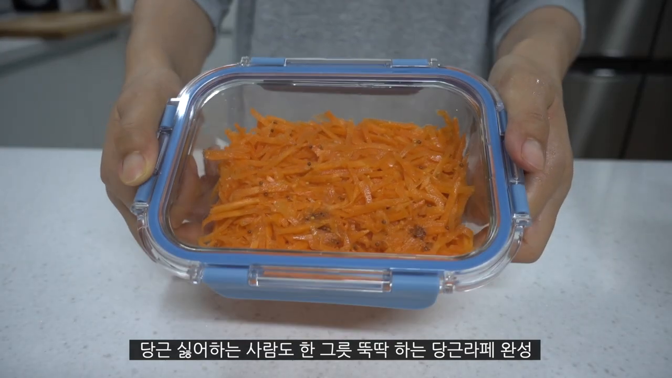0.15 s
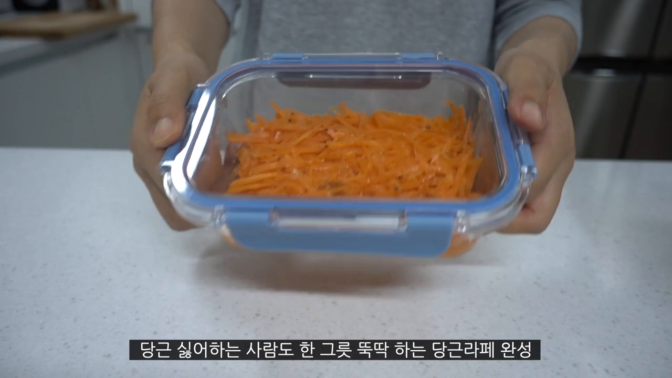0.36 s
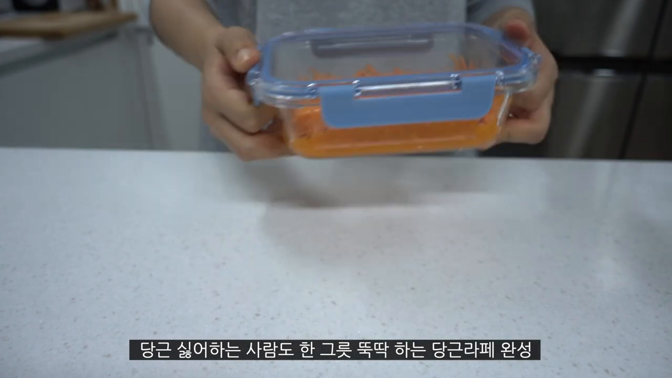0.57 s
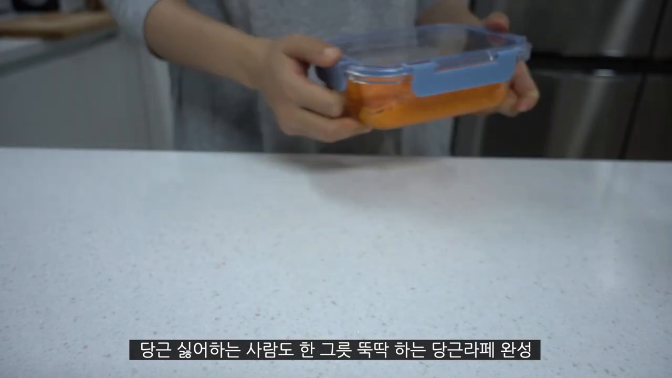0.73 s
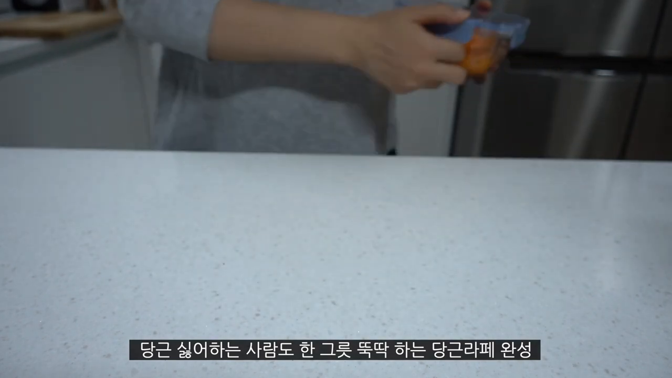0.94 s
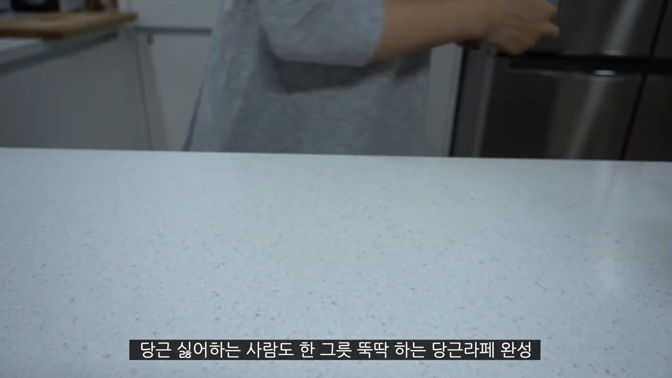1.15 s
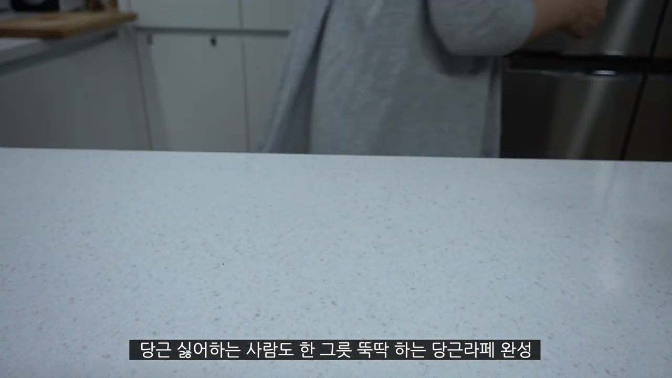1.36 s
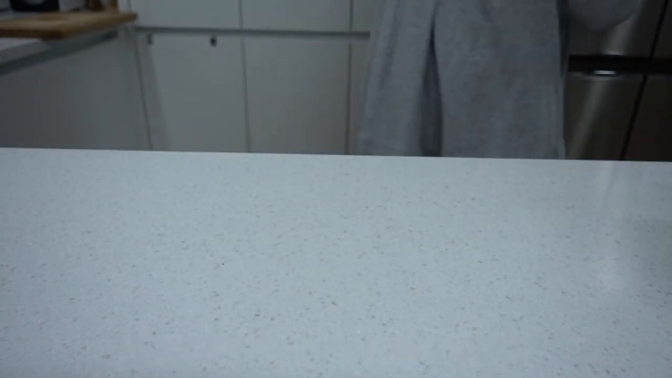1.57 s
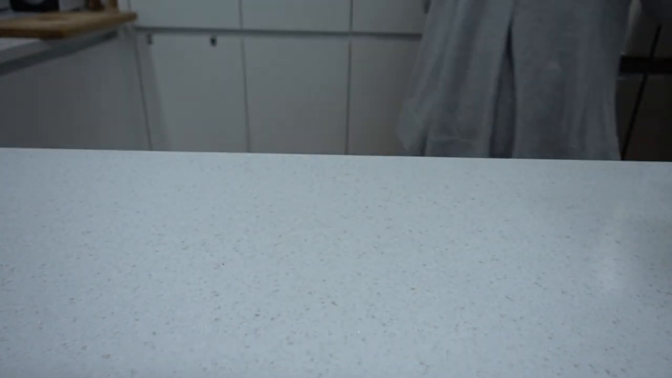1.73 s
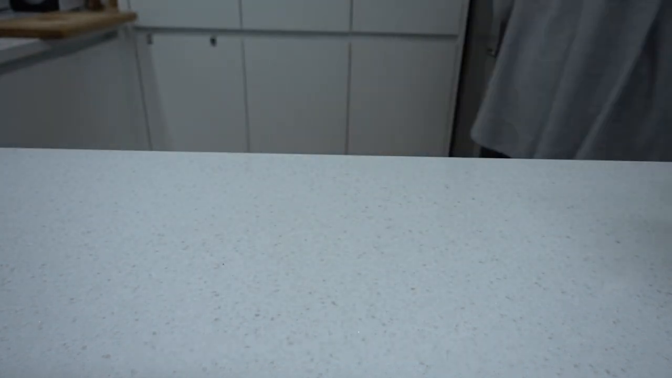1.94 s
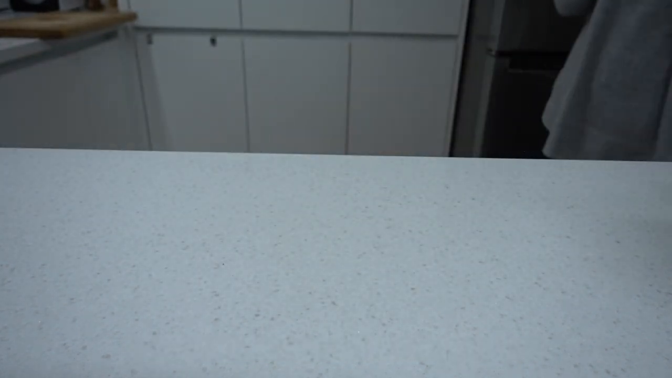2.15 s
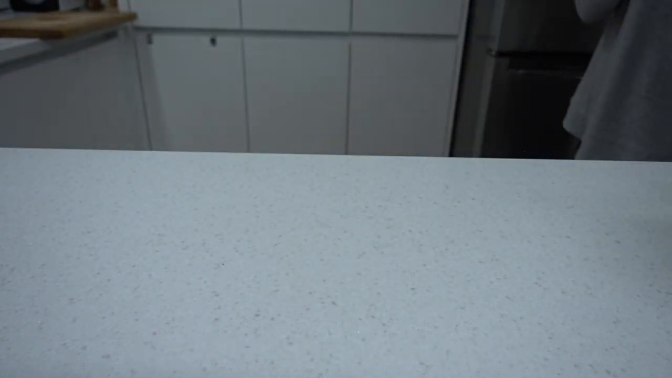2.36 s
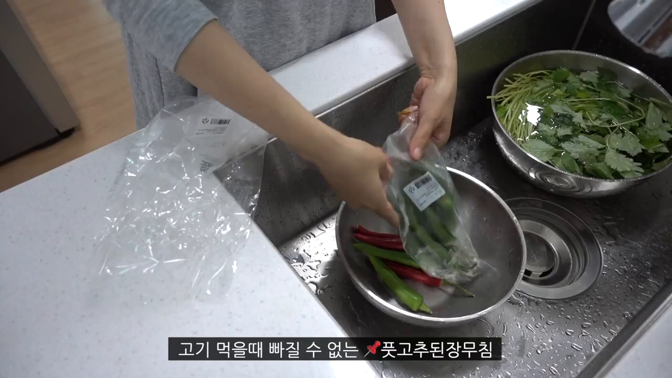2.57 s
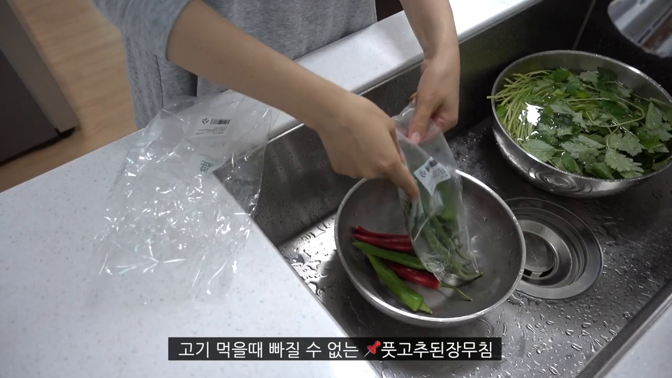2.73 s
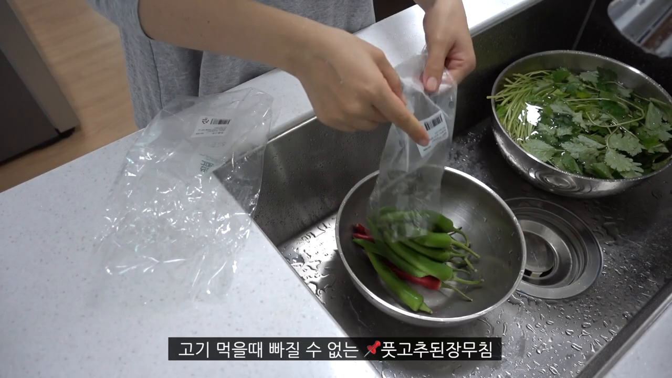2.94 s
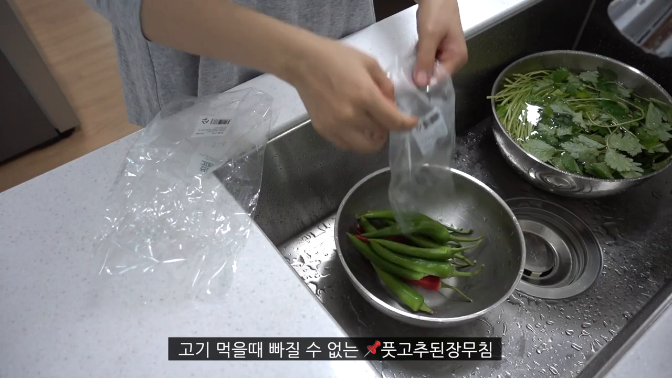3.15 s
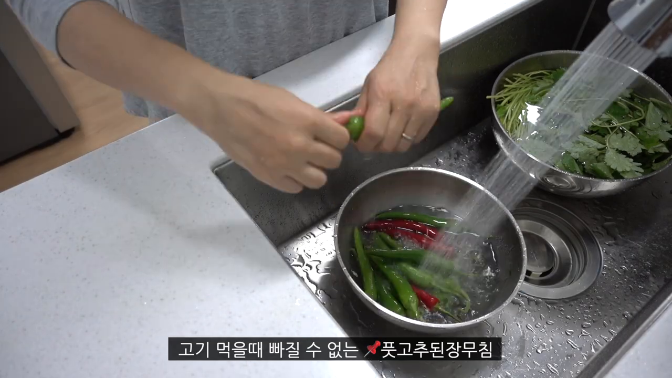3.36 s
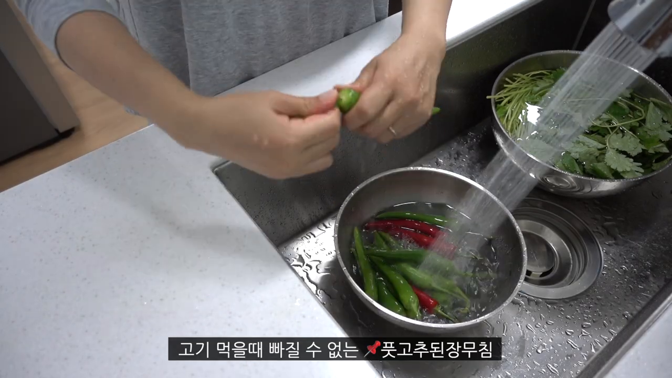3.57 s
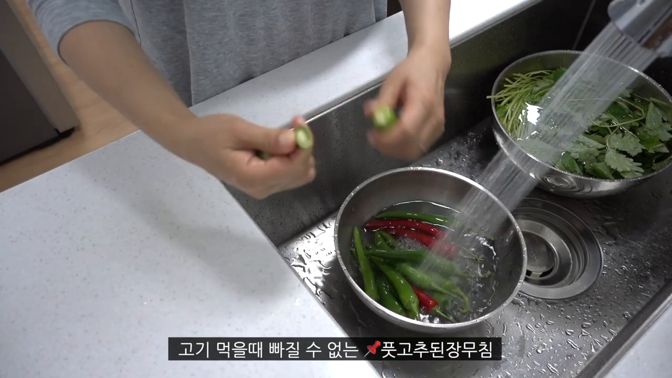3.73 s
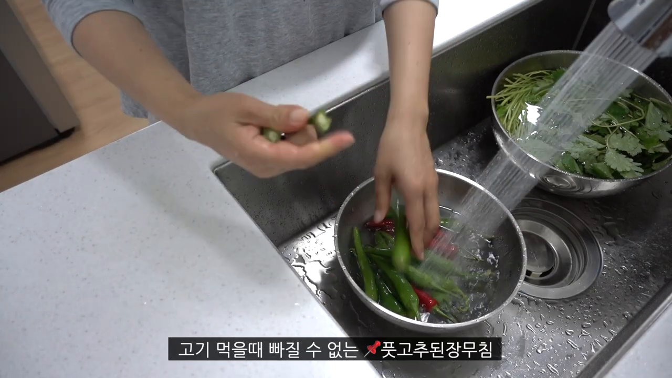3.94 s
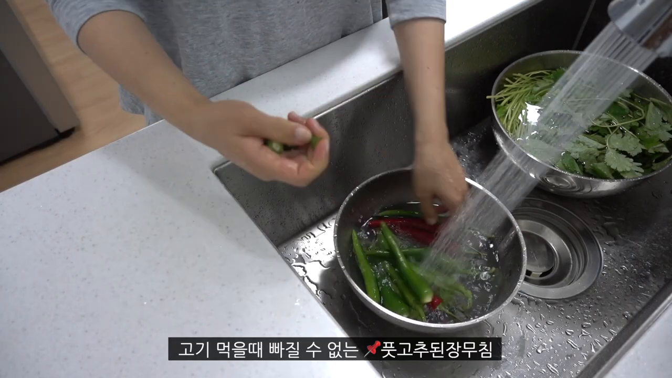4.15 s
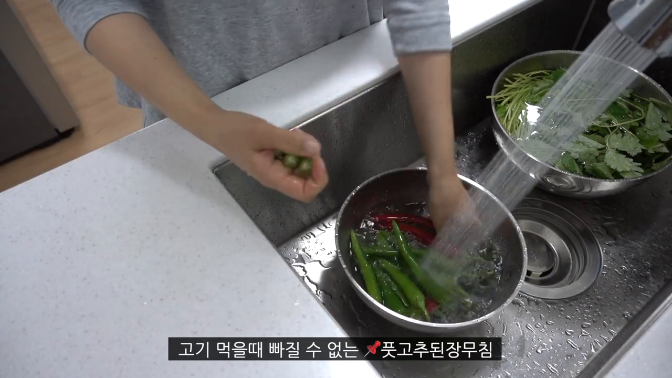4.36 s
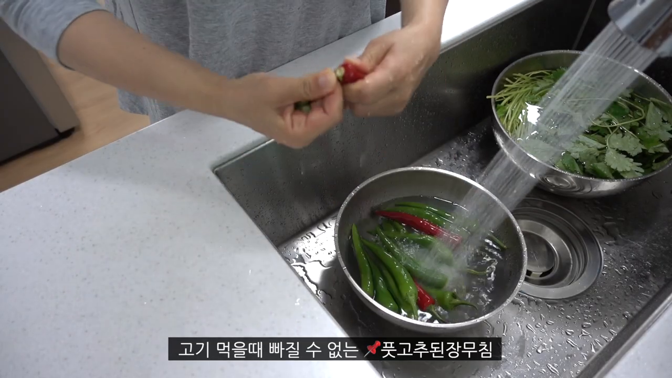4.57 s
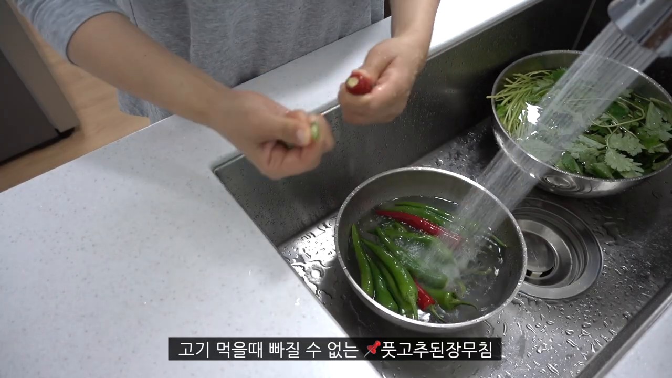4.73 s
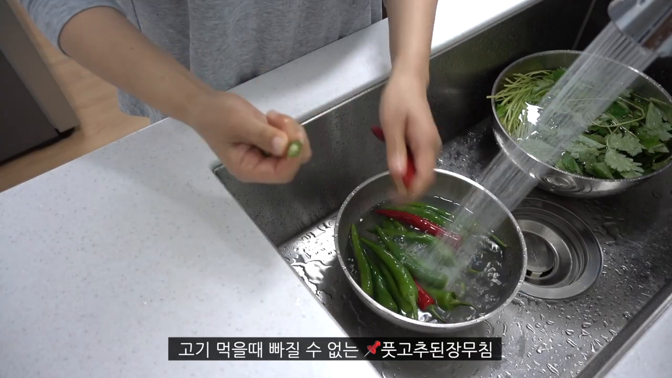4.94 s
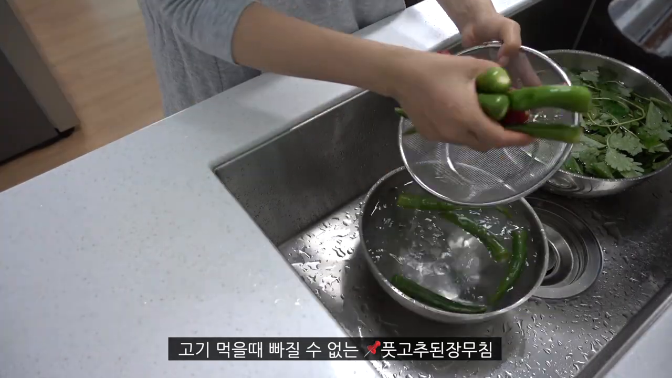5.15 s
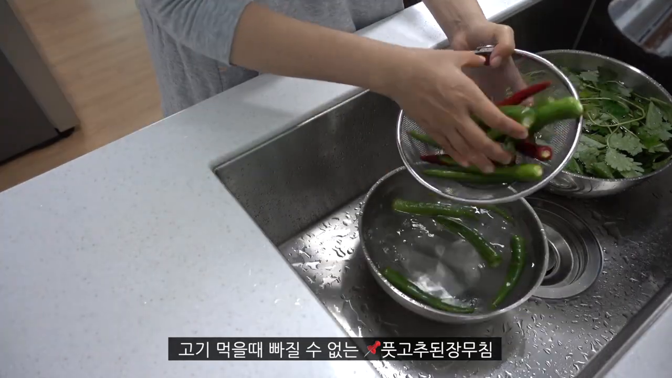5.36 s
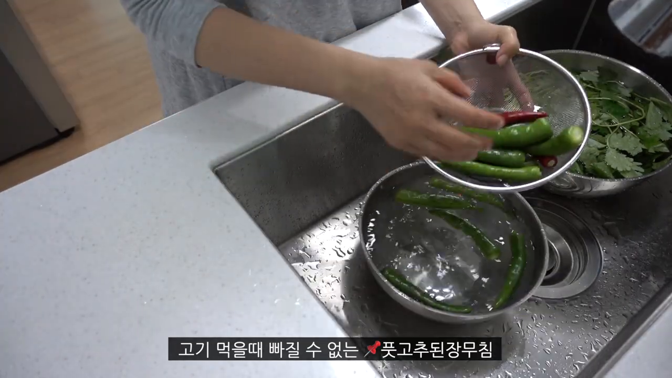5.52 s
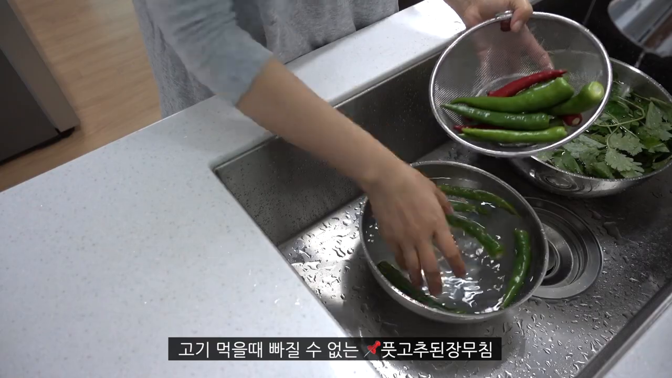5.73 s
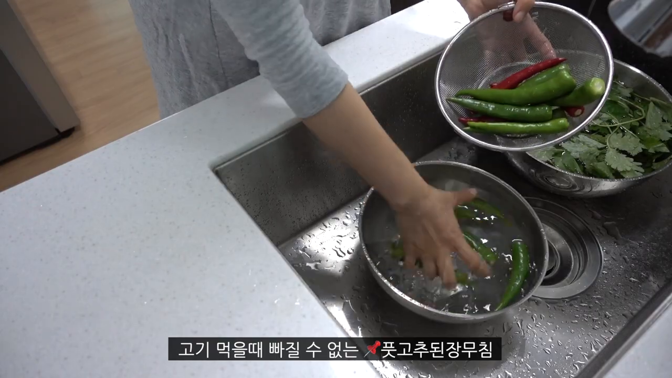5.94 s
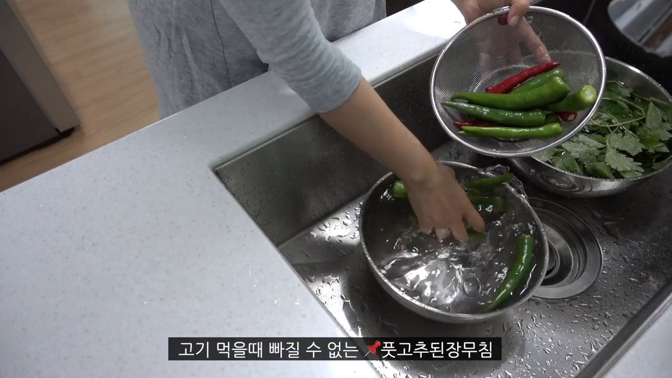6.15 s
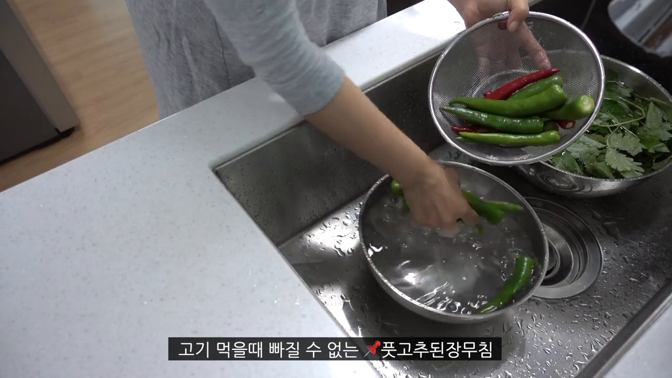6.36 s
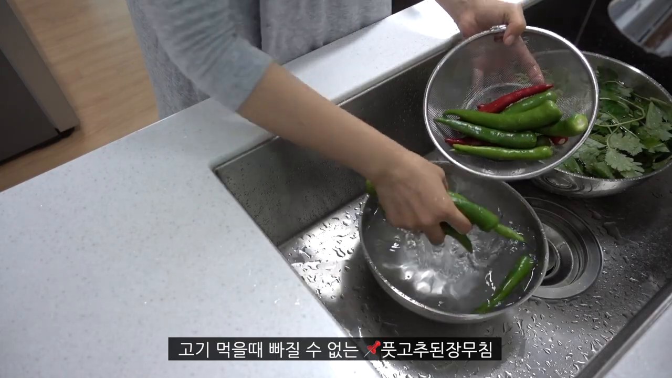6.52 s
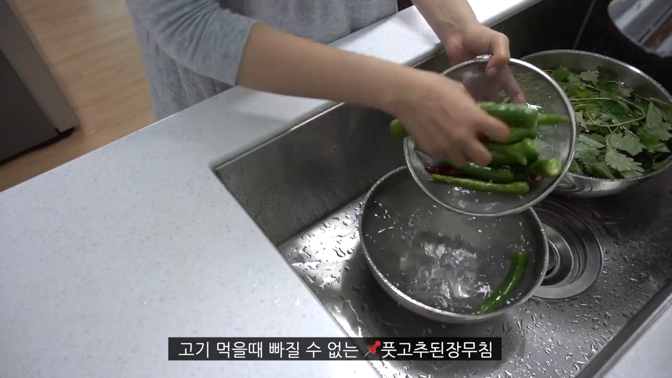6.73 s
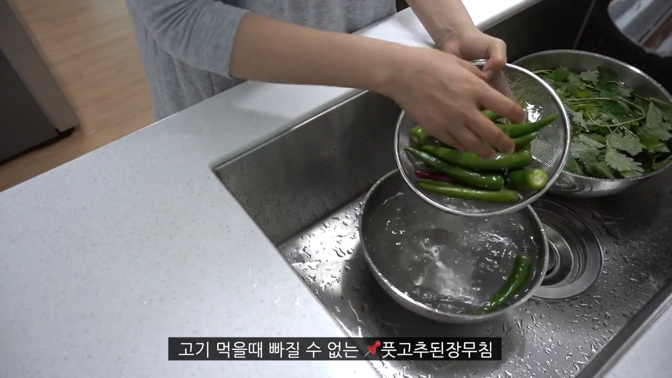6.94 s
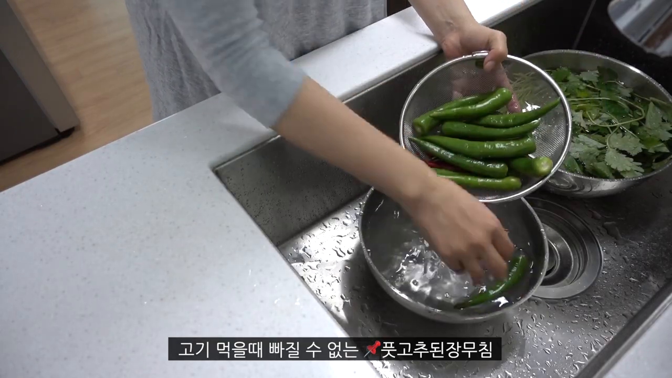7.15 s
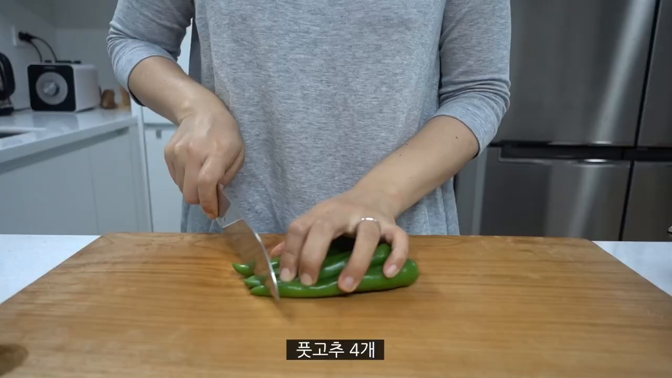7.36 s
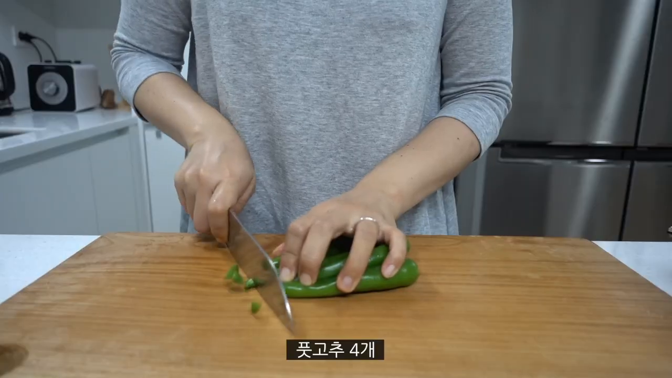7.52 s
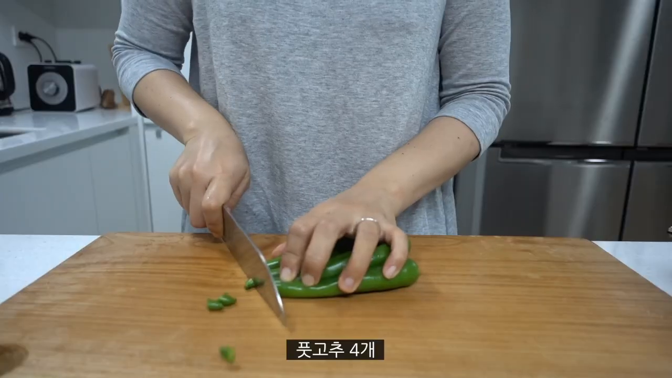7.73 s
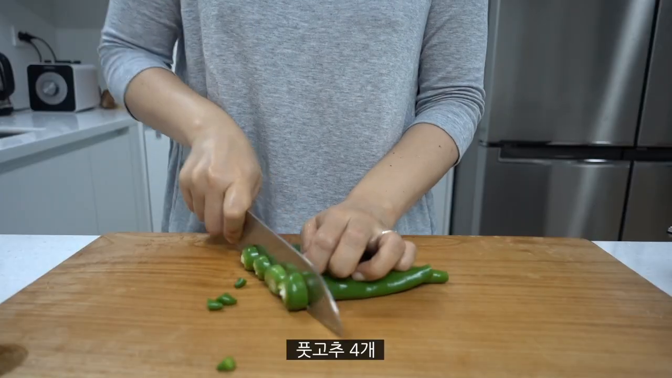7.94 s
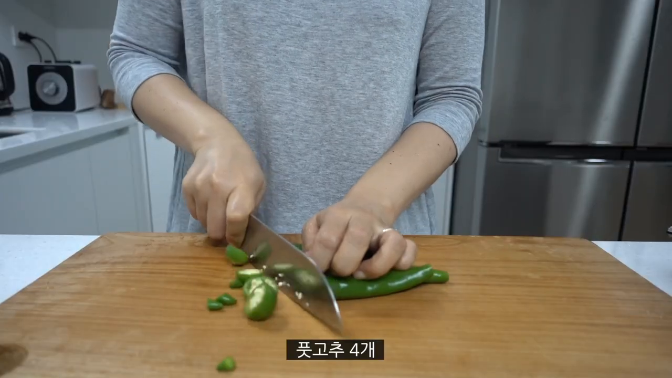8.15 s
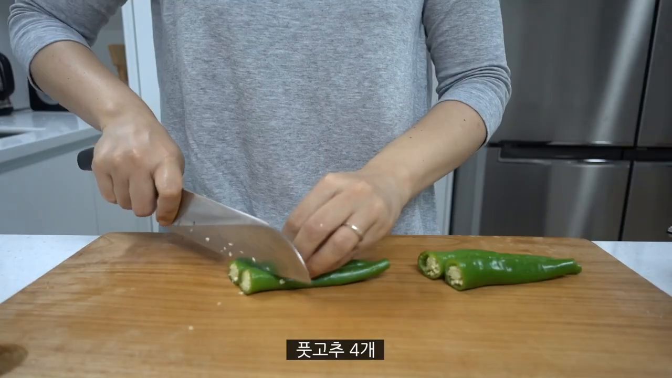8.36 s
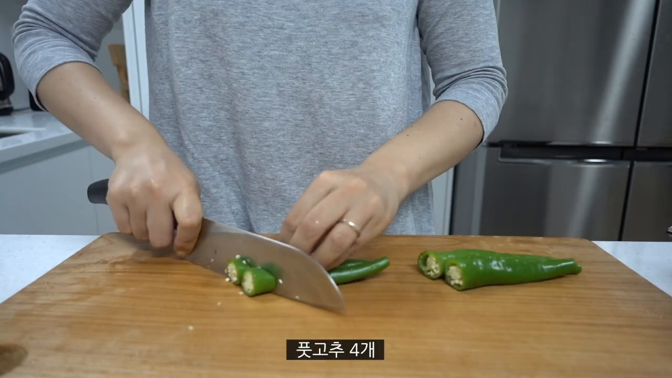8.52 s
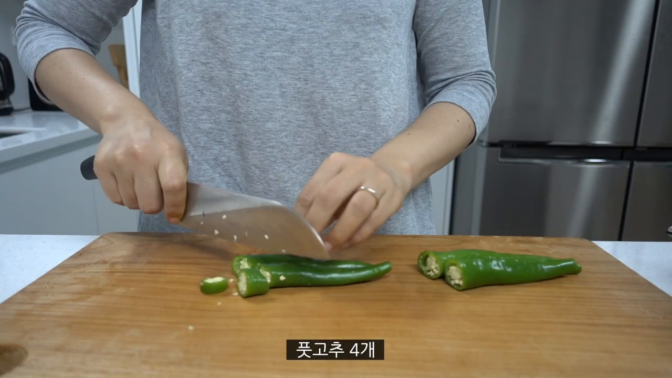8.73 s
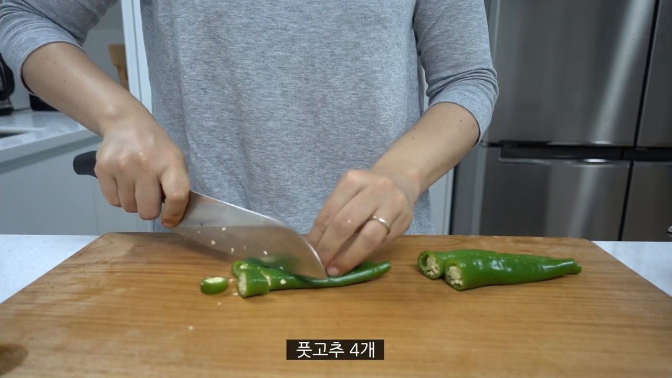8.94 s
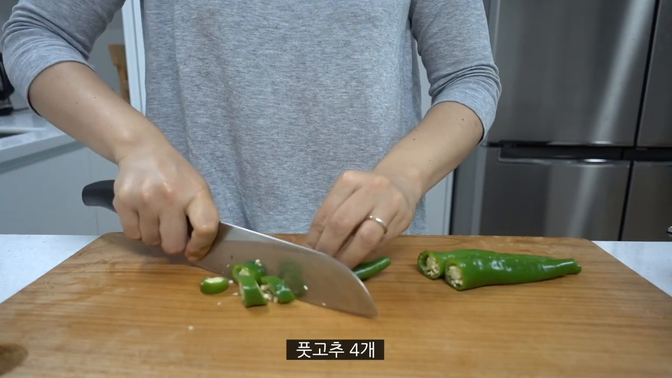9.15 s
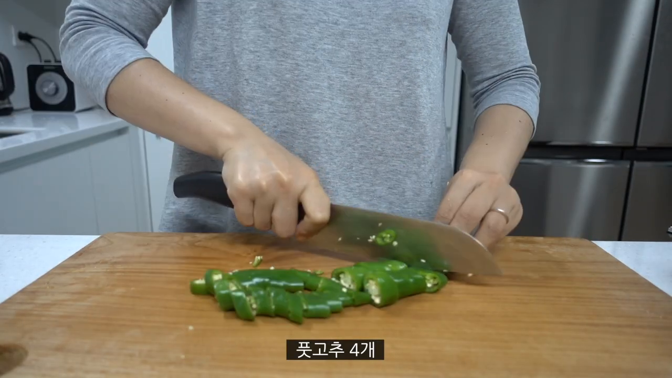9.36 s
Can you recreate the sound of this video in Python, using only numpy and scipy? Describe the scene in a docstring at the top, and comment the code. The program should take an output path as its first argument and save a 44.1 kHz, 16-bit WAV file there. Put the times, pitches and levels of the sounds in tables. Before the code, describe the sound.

In a quiet home kitchen, clothes rustle faintly and a dull shuffle recedes. A plastic bag crinkles sharply while peppers tumble into a steel bowl. Abruptly a spray tap drums and hisses, with a stem snapping. Then water swishes, plops and drips as peppers are lifted out. Finally a knife crunches through peppers and knocks hard on a wooden board. Close stereo microphones, short lively echo.

```python
"""Quiet room air and rustling clothes come first, then a dull shuffle: green peppers are prepared in a kitchen.
In short passages joined end to end, noise crinkles like a plastic bag and clicks tumble like sliding peppers.
Showers of clicks make a spray tap fill a steel bowl in the sink; a noisy burst is a stem snapping.
A hand swishes the water and lifts the peppers dripping into a sieve: clicks splash, climbing tones are bubbles.
Last, a knife crunches through them, in swelling showers of clicks, and knocks on a ringing wooden board."""
import sys
import numpy as np
from scipy import signal
from scipy.fft import rfft, irfft, next_fast_len
from scipy.io import wavfile
from scipy.ndimage import uniform_filter1d, map_coordinates

SR = 44100
rng = np.random.default_rng(int(sys.argv[2]) if len(sys.argv) > 2 else 0)


def waveform_to_disk(signal):
    """Save audio, clipped to [-1, 1], as 16-bit WAV at the path in sys.argv[1]."""
    frames = np.transpose(np.atleast_2d(signal))
    scaled = np.clip(frames, -1, 1) * 32767
    samples = np.round(scaled).astype(np.int16)
    wavfile.write(sys.argv[1], SR, samples)


N = 414099

# passages of sound: (start t/s, end t/s)
HALL_SPAN, BAG_SPAN = (-1, 2.52), (2.518, 3.387)
TAP_SPAN, WASH_SPAN = (3.387, 5.104), (5.104, 7.352)
# moments when the board's sound is cut off: t/s
BOARD_ENDS = [8.312, 9.268]

# room air, steady within each step: (from t/s, level/dB)
ROOM_TONE = [(0, -62), (5.104, -58), (7.352, -59), (8.312, -65)]
# a sleeve brushes the apron: (t/s, length/s, level/dB)
BRUSHES = [(1.25, 0.047, -65.5), (1.76, 0.068, -55), (2.15, 0.065, -58), (2.38, .14, -54.5)]
# dull shuffles across the room: (t/s, length/s, level/dB)
SHUFFLES = [(2.222, .02, -56.5), (2.36, 0.12, -41)]
# shakes of the bag: (t/s, length/s, level/dB)
SHAKES = [(2.516, 0.029, -27), (2.55, 0.075, -20), (2.715, 0.059, -26.5), (2.8, 0.057, -26),
          (2.88, 0.066, -30), (3.028, 0.11, -33.5), (3.219, 0.039, -31)]
# tumbling peppers vary less than the film: level/dB under a full-scale shake, dB per dB of shake
TUMBLE_DB, TUMBLE_FOLLOWS = -11, 0.76
# brittle snaps of plastic film, a pepper stem and pepper skin:
# (t/s, level/dB, length/s, centre f/Hz, width/octaves)
SNAPS = [(2.7524, -20.5, 0.002, 4000, 1.3), (3.086, -32, 0.0098, 5500, 1.8),
         (3.136, -16.5, 0.0082, 6540, 0.06), (4.2605, -18, 0.054, 5100, 1.1), (7.546, -29, .014, 2900, .12),
         (7.893, -33.5, 0.028, 1620, .8), (7.979, -28.5, 0.021, 1850, 0.65),
         (8.41, -32.5, 0.042, 2300, 0.54), (9.067, -18, 0.014, 5500, 1.8)]
TAP_DB = -24  # level of the jets, dB
# a dull low thud, then single fading notes from the touched bowl: (t/s, peak level/dB, f/Hz, t60/s)
THUD_AND_NOTES = [(4.062, -37, 214, 0.079), (4.266, -24, 1763, 0.3), (5.141, -43, 2130, 0.07),
                  (5.147, -37, 1363, 0.06)]
# wet slaps: (t/s, level/dB, length/s, centre f/Hz, width/octaves)
SLAPS = [(5.127, -46, 0.0055, 6000, 0.26), (5.314, -28.5, 0.0093, 7100, 0.28),
         (5.936, -30, 0.0054, 6370, 1.1), (6.395, -33, 0.017, 3050, 9.5), (7.269, -44.5, 0.012, 980, 0.4),
         (7.2705, -33.5, 0.017, 7430, 0.18)]
# single air bubbles: (t/s, peak level/dB, starting f/Hz, t60/s)
BUBBLES = [(5.2246, -31, 1615, 0.024), (5.23, -34, 2280, .035), (5.318, -33, 1530, 0.035),
           (5.368, -38, 622, 0.099), (5.9379, -17.5, 1670, 0.035), (5.988, -34, 1190, .05),
           (6.002, -38.5, 520, 0.07), (6.03, -35.5, 880, 0.05), (6.04, -29, 2605, 0.07),
           (6.074, -40, 635, 0.11), (6.1022, -34.5, 2490, 0.065), (6.1978, -39.5, 2720, .04),
           (6.266, -36.5, 2090, 0.022), (6.3977, -23.5, 2220, 0.04), (6.4555, -36, 2880, 0.05),
           (6.457, -39, 744, 0.067), (6.782, -39, 3750, .04), (6.853, -38, 3320, 0.04),
           (6.9992, -29.5, 2950, 0.14)]
CLIMB = 0.1  # share by which a bubble's pitch climbs
# the wet sieve drips onto the steel: (t/s, level/dB, centre f/Hz)
DRIPS = [(6.213, -49, 11700), (6.513, -41.5, 6140), (6.759, -45.5, 8540), (6.815, -36.5, 8900),
         (6.849, -38, 8500)]
# the hand sweeps through the water: (t/s, length/s, level/dB)
STIRS = [(5.305, 0.13, -44), (5.887, 0.038, -46.5), (5.95, 0.11, -46), (6.393, 0.09, -43),
         (6.875, 0.041, -43.5)]
# showers of fine drops from hand and sieve: (t/s, length/s, level/dB)
SHOWERS = [(5.287, 0.16, -33), (5.84, 0.071, -43), (6.4, 0.15, -46.5), (6.58, 0.3, -48),
           (6.888, 0.083, -30.5)]
# the hand thuds dully against the bowl: (t/s, level/dB, length/s, centre f/Hz, width/octaves)
THUDS = [(7.275, -55, 0.077, 140, 0.9)]
# the bowl is nudged and rings on: t/s, level/dB of a ringing note listed at 0 dB
NUDGE_S, NUDGE_DB = 7.286, -39
# the blade scrapes along board or pepper and sings: (t/s, length/s, level/dB, note f/Hz, lift of note/dB)
SLIDES = [(7.461, 0.013, -52, 2780, -2), (8.074, 0.074, -47.5, 4660, 7), (8.93, 0.07, -58, 2600, 13),
          (9.006, 0.057, -39, 2630, 11), (9.281, 0.077, -61, 1335, 15)]
BLADE_WIDTH_HZ = 190  # width of the blade's note
# strokes of the knife: (landing t/s, knock level/dB, rise/s, chatter/s, brightness/dB per octave,
# crunch level/dB, press/s)
CUTS = [(7.546, -20, 0.001, 0.033, 3, -36, 0.095), (7.996, -17, 0.0011, 0.028, 2, -24, 0.083),
        (8.281, -50, 0.0018, .025, -4.5, -82, .06), (8.443, -23, 0.0027, 0.029, 0.5, -28, 0.089),
        (9.087, -27.5, 0.0014, 0.017, -1, -31, 0.16)]
# the crunch grows by this many dB over the press, and ends this many seconds before the blade lands
PRESS_GROWS_DB, THROUGH_S = 35, 0.0055
CELL_SPREAD_DB = 8  # how unevenly the pepper's cells burst
BOARD_RING_DB = -10.5  # level of the board's ringing under the knock

# ringing notes of the bowl: (f/Hz, relative level/dB)
BOWL = [(93, -21), (670, -9), (1690, -14), (2239, -7), (2785, 0), (3305, -11), (5550, -15), (6912, -8)]
# ringing notes of the cutting board: (f/Hz, relative level/dB)
BOARD = [(527, 0), (1185, -1), (1268, 1), (1396, 6), (1540, 1), (1680, 1), (1848, 3), (1944, 3)]
BOWL_T60, BOARD_T60 = 0.21, 0.3  # time to fade by 60 dB, s
# resonances of the sink: (f/Hz, width/Hz, lift/dB)
SINK = [(185.5, 24.5, 18), (217.8, 9.3, 18), (398.4, 20, 13.5), (662.3, 30, 16), (770.4, 26.4, 15.5),
        (2350, 160, 4), (2610, 99, 4.5)]

# colour of the room air: (f/Hz, relative level/dB)
AIR = [(40, -57.5), (180, -23.5), (280, -10.5), (400, -13), (700, -7.5), (1400, -11.5), (3400, -16.5),
       (16000, -24)]
# colour of rubbing cloth: (f/Hz, relative level/dB)
FABRIC = [(200, -26.5), (1600, -13), (2600, -2.5), (5000, -9), (16000, -11.5)]
# colour of the shuffle across the room: (f/Hz, relative level/dB)
DISTANT = [(80, -48), (380, -12), (940, -4.5), (2000, -9), (16000, -52.5)]
# colour of crinkling plastic film: (f/Hz, relative level/dB)
FILM = [(500, -54.5), (2500, -15.5), (4500, -2.5), (8500, 0), (16000, -9.5)]
# colour of tumbling peppers: (f/Hz, relative level/dB)
TUMBLE = [(50, -46), (250, -21), (1100, -4.5), (2200, -2.5), (3200, -7.5), (16000, -46.5)]
# colour of the tap's jets: (f/Hz, relative level/dB)
JET = [(120, -42), (260, -27), (500, -16.5), (1000, -5.5), (3400, -6.5), (7900, 0), (16000, -4)]
# colour of fine drops: (f/Hz, relative level/dB)
DROPLETS = [(500, -35.5), (3500, -9.5), (5000, -1), (12000, -2), (16000, -7)]
# colour of stirred water: (f/Hz, relative level/dB)
WATER = [(25, -26), (110, -35), (190, -16), (600, -6), (2200, 1), (4000, -6), (16000, -24)]
# colour of crunching pepper and scraping blade: (f/Hz, relative level/dB)
FLESH = [(40, -43), (200, -29), (600, -4.5), (2400, 3), (3500, -1.5), (9000, -1.5), (16000, -11.5)]
# colour of a knock on wood, before each cut's brightness: (f/Hz, relative level/dB)
WOOD = [(40, -75.5), (200, -30), (530, -10), (1000, -6), (1330, 2), (2080, -3), (2450, -12), (3100, -16),
        (3600, -27.5), (16000, -44.5)]

# how long the kitchen echoes: (f/Hz, t60/s)
KITCHEN = [(150, 0.19), (600, 0.59), (1500, 0.52), (4000, 0.29), (12000, 0.22)]
# left-right likeness of sound from all sides: (f/Hz, likeness from 0 to 1)
ALIKE = [(100, 0.92), (500, 0.76), (1000, 0.11), (2000, 0.65), (4000, 0.037), (8000, 0.024)]
LINGER_DB, LINGER_T60 = -22, 0.77  # what lingers after a movement: dB under it, s
# left-right difference kept by two close microphones: (f/Hz, gain/dB)
WIDTH = [(100, -20.5), (400, -4.5), (1000, -5), (2500, 0), (9000, -2.5)]
# all but the blade's scrapes, crunches and knocks reaches the left microphone this much later
SINK_LAG_S = 4e-05
TOP_HZ = 16100  # nothing is kept from here up


def amp(db):
    """Turn dB into a gain."""
    return 10 ** (np.asarray(db) / 20)


def unit(x):
    """Scale a sound to an average (rms) level of 1."""
    return x / np.sqrt(np.mean(x ** 2) + 1e-20)


def along(points, hz):
    """Read a curve of (Hz, value) points on a log frequency axis."""
    f, v = np.transpose(points)
    return np.interp(np.log(hz + 1), np.log(f + 1), v)


def shot(x, span):
    """Keep the sound of one passage only, with tiny fades at its ends."""
    t = np.arange(N) / SR
    inside = (t > span[0]) & (t < span[1])
    return x * uniform_filter1d(1. * inside, size=128)


def add(track, s, x):
    """Mix a short stereo sound in at time s, in place."""
    part = track[:, round(s * SR):][:, :x.shape[1]]
    part += x[:, :part.shape[1]]


def colour(x, spectrum, peaks=()):
    """Filter with a broad spectrum and ringing resonances on top; nothing sounds before its cause."""
    hz = np.fft.rfftfreq(2 ** 14, 1 / SR)
    db = along(spectrum, hz)
    for f, width, lift in peaks:
        db = db + lift / (1 + ((hz - f) / width) ** 2 * 2)
    # fold the log spectrum to one side in time, so that the filter answers as early as it can
    cepstrum = irfft(np.log(amp(db)))
    half = len(hz) - 1
    response = irfft(np.exp(rfft(2 * cepstrum[:half], 2 * half)))[:half]
    return signal.oaconvolve(x, response[None], axes=1)[:, :x.shape[1]]


def diffuse(n):
    """Stereo noise from all sides: alike in the bass, nearly unrelated in the treble."""
    m = next_fast_len(n)
    likeness = along(ALIKE, np.fft.rfftfreq(m, 1 / SR))
    turn = np.arccos(np.clip(likeness, -1, 1)) / 2
    noise = rfft(rng.standard_normal((2, m)))
    mid, side = irfft(noise * [np.cos(turn), np.sin(turn)], m)[:, :n]
    return np.array([mid + side, mid - side])


def room(x, wet_db, near_db=6, near_s=0.013):
    """Direct sound, strong early answers of counter and cupboards, and the kitchen's tail."""
    hz, t, z = signal.stft(diffuse(SR // 2), SR, nperseg=256)
    fade_db = -60 * t / along(KITCHEN, hz)[:, None]
    early_db = near_db * np.exp(-(t / near_s) ** 2)
    tail = signal.istft(z * amp(fade_db + early_db), SR, nperseg=256)[1]
    response = amp(wet_db) * tail / np.linalg.norm(tail[0])
    response[:, 0] += 1  # the direct sound
    return signal.oaconvolve(np.array([x, x]), response, axes=1)[:, :len(x)]


def dying(since, t60):
    """Gain of a sound that has stopped: a quick fall, then the kitchen lingers."""
    since = np.maximum(since, 0)
    return np.hypot(amp(-60 * since / t60), amp(LINGER_DB - 60 * since / LINGER_T60))


def strokes(rows, attack_s, release_t60, grow_db_per_s=0):
    """Gain of a series of movements: each sets in, can grow towards its end, and dies away."""
    t, power = np.arange(N) / SR, np.zeros(N)
    for s, length, db in rows:
        onset = 1 - np.exp(-np.maximum(t - s, 0) / attack_s)
        level = amp(db - grow_db_per_s * np.maximum(s + length - t, 0))
        power += (onset * level * dying(t - s - length, release_t60)) ** 2
    return np.sqrt(power)


def clicks(n, rate, spread_db):
    """Random tiny impulses of uneven size, rate a second."""
    sizes = amp(spread_db * np.clip(rng.standard_normal(n), -2, 2))
    signs = rng.choice([-1, 1], n)
    return sizes * signs * (rng.random(n) < rate / SR)


def wobble(rate):
    """A smooth random curve, rate knots a second."""
    knots = rng.standard_normal(int(N * rate / SR) + 4)
    return map_coordinates(knots, [np.arange(N) * rate / SR])


def patter(spectrum, rate, spread_db, wet_db, peaks=(), clump_db=0):
    """A shower of coloured clicks, rms 1; they can come in clumps, and their echoes merge into a wash."""
    places = amp(np.array([[3], [-3]]) * rng.standard_normal(N))  # each click leans left or right
    direct = unit(clicks(N, rate, spread_db) * places)
    wash = amp(wet_db) * unit(diffuse(N))
    clumps = amp(clump_db * wobble(70))
    return unit(colour(clumps * (direct + wash), spectrum, peaks))


def background():
    """Room air, then clothes and a dull shuffle as the cook walks off: coloured noise and clicks."""
    starts, levels = np.transpose(ROOM_TONE)
    tone_db = levels[np.searchsorted(starts[1:], np.arange(N) / SR)]
    air = amp(tone_db) * unit(colour(diffuse(N), AIR))
    brushing = strokes(BRUSHES, attack_s=0.012, release_t60=1.0)
    cloth = brushing * unit(colour(diffuse(N), FABRIC))
    steps = strokes(SHUFFLES, attack_s=0.0026, release_t60=0.46, grow_db_per_s=71)
    shuffle = steps * patter(DISTANT, rate=2000, spread_db=4, wet_db=9, clump_db=1)
    return air + shot(cloth + shuffle, HALL_SPAN)


def drifting(x, depth_db):
    """Random patches of gain in frequency and time make the tone colour wander; rms 1."""
    z = signal.stft(x, nperseg=512)[2]
    field = rng.standard_normal(z.shape[1:])
    field = uniform_filter1d(field, size=8, axis=0)
    field = uniform_filter1d(field, size=14, axis=1)
    return unit(signal.istft(z * amp(depth_db * unit(field)), nperseg=512)[1][:, :N])


def bag():
    """Thin film crinkles in fits at each shake while the peppers slide and tumble into the bowl."""
    crinkle = strokes(SHAKES, attack_s=0.0053, release_t60=0.42)
    film = crinkle * patter(FILM, rate=1200, spread_db=5.0, wet_db=4.5, clump_db=1.45)
    tumble = amp(TUMBLE_DB) * crinkle ** TUMBLE_FOLLOWS
    hollows = [(203, 30, 8), (640, 45, 8)]  # resonances: f/Hz, width/Hz, lift/dB
    peppers = tumble * patter(TUMBLE, rate=900, spread_db=5, wet_db=3, peaks=hollows, clump_db=1.2)
    peppers = drifting(peppers, depth_db=1.5) * np.std(peppers)  # wander, but keep the level
    return shot(film + peppers, BAG_SPAN)


def bursts(rows, wet_db, low_hz):
    """Short volleys of clicks in one band: something tears, splashes or thuds, with little deep bass."""
    out, t = np.zeros((2, N)), np.arange(SR // 3) / SR
    hz = np.geomspace(30, SR / 2, 200)
    for s, db, length, centre_hz, octaves in rows:
        volley = clicks(len(t), rate=6000, spread_db=3.0) * np.exp(-(t / length) ** 4)
        loss = 1 + (np.log2(hz / centre_hz) / octaves) ** 2 / 2
        loss = loss * (1 + (low_hz / hz) ** 2)
        x = colour(room(volley, wet_db), np.transpose([hz, -20 * np.log10(loss)]))
        rms = np.sqrt(np.mean(x[:, t < length] ** 2) + 1e-20)
        add(out, s, amp(db) * x / rms)
    return out


def snaps():
    """Film, a pepper stem and pepper skin give way suddenly, each time in a short volley of clicks."""
    return bursts(SNAPS, wet_db=-4, low_hz=400)


def ping(t, hz, t60, rise):
    """A damped sine that swells within a few cycles; its pitch can climb quickly, then settle."""
    pitch = hz * (1 + rise * (1 - np.exp(-7 * t / t60)))
    swell = 1 - np.exp(-(t * hz / 3) ** 2)
    return np.sin(2 * np.pi * np.cumsum(pitch, axis=-1) / SR) * amp(-60 * t / t60) * swell


def gurgle(rate, centre_hz, octaves, cycles, spread_db):
    """A swarm of small bubbles, rms 1: many pings at random times, each fading over its own cycles."""
    count = int(rate * N / SR)
    start = rng.integers(N, size=(count, 1))
    pitch, size = np.clip(rng.standard_normal((count, 2, 1)), -2, 2).transpose(1, 0, 2)
    hz = centre_hz * 2 ** (octaves * pitch)
    i = np.arange(SR // 25)
    swarm = amp(spread_db * size) * ping(i / SR, hz, cycles / hz, rise=0.1)
    mixed = np.bincount((start + i).ravel(), swarm.ravel(), N)[:N]
    return unit(room(mixed, wet_db=-1))


def tap():
    """Many fine jets drum on peppers and water and ring the steel bowl and sink; tiny bubbles froth."""
    jets = patter(JET, rate=5000, spread_db=6.0, wet_db=4.0, peaks=SINK, clump_db=1.13)
    jets = drifting(jets, depth_db=1.5)  # the jets meet ever new surfaces
    froth = amp(-21) * gurgle(rate=46, centre_hz=8000, octaves=0.51, cycles=72, spread_db=3.0)
    return shot(amp(TAP_DB) * (jets + froth), TAP_SPAN)


def rings(rows, wet_db, climb=0):
    """Single damped tones, each with its own echo."""
    out, t = np.zeros((2, N)), np.arange(SR // 2) / SR
    for s, db, hz, t60 in rows:
        tone = room(ping(t, hz, t60, climb), wet_db, near_db=9)
        add(out, s, amp(db) * tone / np.abs(tone).max())
    return out


def thud_and_notes():
    """A dull low thud, then single fading notes from the touched bowl, all as damped sines."""
    return rings(THUD_AND_NOTES, wet_db=-4)


def plops():
    """A drop breaks the surface with a splat; its bubble rings and climbs in pitch. Drips only spatter."""
    splats = [(s, db - 12, .009, hz, .18) for s, db, hz, t60 in BUBBLES]
    spatters = [(s, db, .006, hz, .12) for s, db, hz in DRIPS]
    tones = rings(BUBBLES, wet_db=-3, climb=CLIMB)
    splashes = bursts(splats + spatters + SLAPS, wet_db=7.5, low_hz=151)
    return shot(tones + splashes, (TAP_SPAN[0], WASH_SPAN[1]))


def washing():
    """The hand stirs the water, which gurgles and sheds fine, tinkling drops."""
    drops = patter(DROPLETS, rate=1200, spread_db=1.5, wet_db=7.5, clump_db=1.8)
    tinkle = amp(-8.5) * gurgle(rate=100, centre_hz=8740, octaves=.4, cycles=130, spread_db=5)
    spray = strokes(SHOWERS, attack_s=0.0039, release_t60=0.27, grow_db_per_s=31)
    hollows = [(88, 20, 7), (210, 50, 11)]  # resonances: f/Hz, width/Hz, lift/dB
    wash = patter(WATER, rate=700, spread_db=4, wet_db=2, peaks=hollows, clump_db=2)
    bubbles = amp(-3) * gurgle(rate=160, centre_hz=1446, octaves=.65, cycles=45, spread_db=3.5)
    slosh = strokes(STIRS, attack_s=0.0031, release_t60=0.44)
    return shot(spray * (drops + tinkle) + slosh * (wash + bubbles), WASH_SPAN)


def ringing(modes, t60, attack_s, tilt_db=0):
    """A struck body: its notes swell and fade, a little differently at each blow and each microphone."""
    t, out = np.arange(SR // 2) / SR, np.zeros((2, SR // 2))
    for hz, db in modes:
        phase = rng.uniform(0, 2 * np.pi) + rng.normal(0, 0.35, (2, 1))
        level = db + tilt_db * np.log2(hz / 1400) + rng.normal(0, 1.5)
        out += amp(level - 60 * t / t60) * np.sin(2 * np.pi * hz * t + phase)
    return out * (1 - np.exp(-t / attack_s))


def bowl():
    """A dull thud in the steel bowl, and a nudge that leaves it ringing."""
    out = bursts(THUDS, wet_db=0.0, low_hz=75)
    add(out, NUDGE_S, amp(NUDGE_DB) * ringing(BOWL, BOWL_T60, attack_s=0.007))
    return shot(out, (BAG_SPAN[0], WASH_SPAN[1]))


def scrapes():
    """The blade grates along in tiny slips that ring its steel."""
    out, t = np.zeros((2, N)), np.arange(SR // 2) / SR
    for s, length, db, hz, lift_db in SLIDES:
        slips = unit(clicks(len(t), rate=3200, spread_db=6.5)) + amp(3) * unit(diffuse(len(t)))
        gain = amp(db) * (1 - np.exp(-t / 0.001)) * dying(t - length, t60=0.23)
        add(out, s, gain * unit(colour(slips, FLESH, [(hz, BLADE_WIDTH_HZ, lift_db)])))
    return out


def crunching():
    """Ever louder, crisp cells burst as the blade presses through the pepper."""
    t, crunch = np.arange(N) / SR, np.zeros(N)
    for s, _, _, _, _, crunch_db, press in CUTS:
        since = t - (s - THROUGH_S)
        pressing = amp(crunch_db + PRESS_GROWS_DB * np.minimum(since, 0) / press)
        crunch = np.hypot(crunch, pressing * dying(since, t60=0.18))
    return crunch * patter(FLESH, rate=3000, spread_db=CELL_SPREAD_DB, wet_db=2.5, clump_db=2.5)


def knock(rise, chatter, tilt_db, first_db, early_t60, late_t60, late_db):
    """The edge strikes the wood, chatters and sets it ringing; cupboards answer at once, the room longer."""
    t = np.arange(SR // 2) / SR
    touching = t < chatter
    contacts = clicks(len(t), rate=2500, spread_db=0.0) * touching
    contacts = contacts / np.std(contacts[touching])
    contacts[0] += amp(first_db)  # the first, hardest contact
    since = np.maximum(t - chatter, 0)
    fade = np.hypot(amp(-60 * since / early_t60), amp(late_db - 60 * since / late_t60))
    echo = fade * unit(diffuse(len(t)))
    wood = [(hz, level + tilt_db * np.log2(hz)) for hz, level in WOOD]
    x = colour(contacts + amp(-4.5) * echo, wood)
    ring = amp(BOARD_RING_DB) * ringing(BOARD, BOARD_T60, attack_s=0.0017, tilt_db=tilt_db)
    return (x / np.std(x[:, touching]) + ring) * (1 - np.exp(-t / rise))


def landings():
    """The blade lands on the board at each stroke; the knock stops where its passage ends."""
    board = np.zeros((2, N))
    for s, db, rise, chatter, tilt_db, _, _ in CUTS:
        left = min(end for end in BOARD_ENDS if end > s) - s
        blow = knock(rise, chatter, tilt_db, first_db=23, early_t60=0.31, late_t60=0.52, late_db=-5.0)
        add(board, s, amp(db) * blow[:, :round(left * SR)])
    return board


def knife():
    """The blade slides, presses crunching through the pepper and lands on the board."""
    return scrapes() + crunching() + landings()


def pan(x, left_db, lag_s=0):
    """Place a sound by how much louder and later it is on the left."""
    m = next_fast_len(N + SR // 2)
    hz = np.fft.rfftfreq(m, 1 / SR)
    lag = np.exp(-1j * np.pi * hz * lag_s * np.array([[1], [-1]]))  # half the lag on each side
    return irfft(rfft(x, m) * lag, m)[:, :N] * amp([[left_db / 2], [-left_db / 2]])


def scene():
    """All but the blade's scrapes, crunches and knocks comes from one place; those are louder on the left."""
    others = bag() + snaps() + tap() + thud_and_notes() + plops() + washing() + bowl()
    return pan(background() + others, left_db=1.5, lag_s=SINK_LAG_S) + pan(knife(), left_db=3.5)


def record(dry):
    """Two close microphones hear the bass nearly alike; nothing is kept above the band limit."""
    m = next_fast_len(N + SR // 2)
    hz = np.fft.rfftfreq(m, 1 / SR)
    left, right = rfft(dry, m)
    mid = (left + right) / 2
    side = (left - right) / 2 * amp(along(WIDTH, hz))
    return irfft(np.array([mid + side, mid - side]) * (hz < TOP_HZ), m)[:, :N]


dry = scene()
out = record(dry)
waveform_to_disk(out)
```